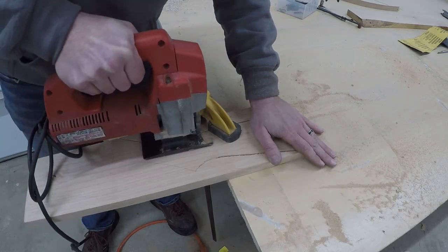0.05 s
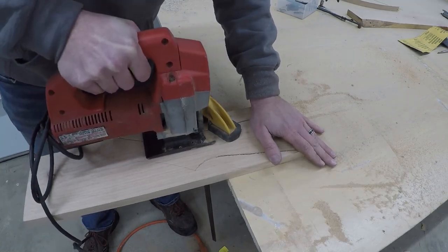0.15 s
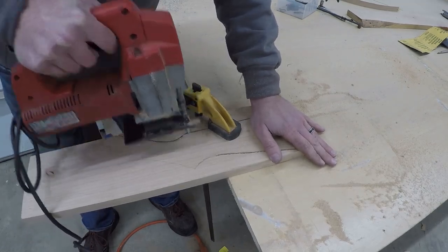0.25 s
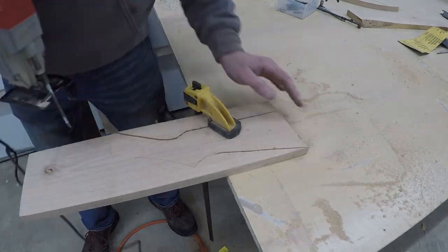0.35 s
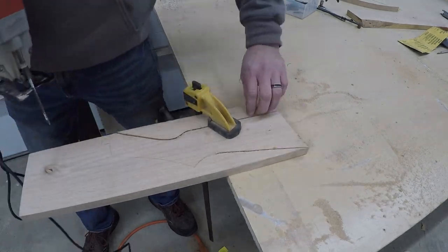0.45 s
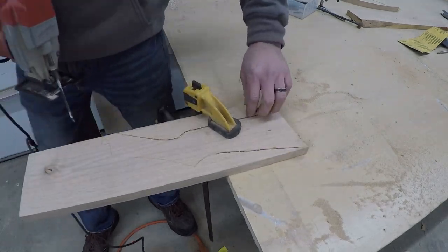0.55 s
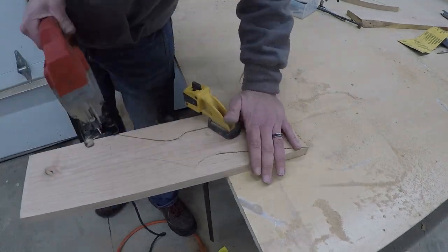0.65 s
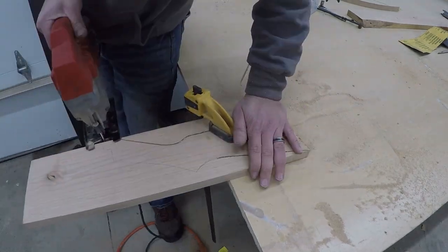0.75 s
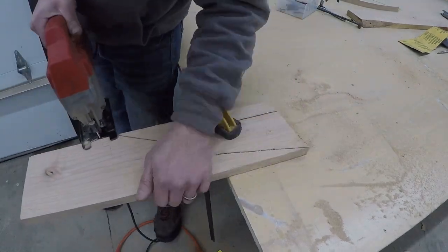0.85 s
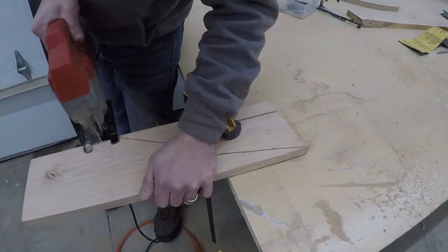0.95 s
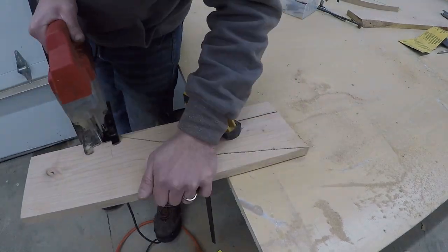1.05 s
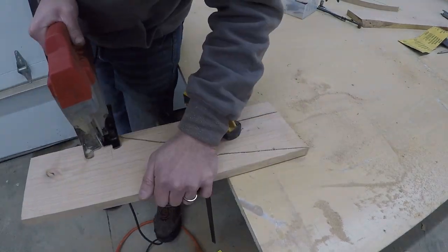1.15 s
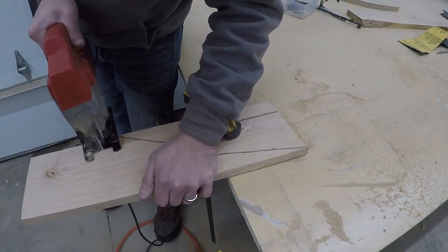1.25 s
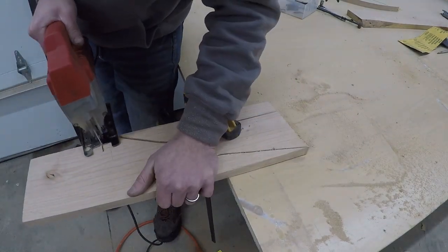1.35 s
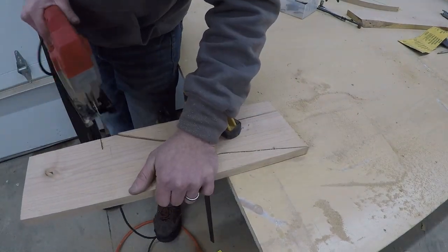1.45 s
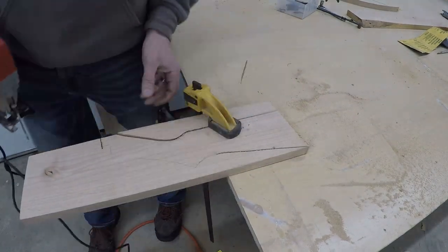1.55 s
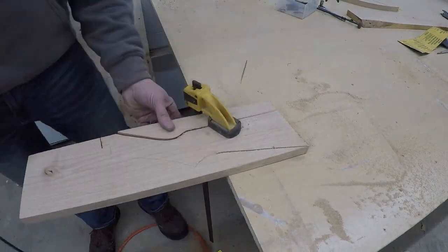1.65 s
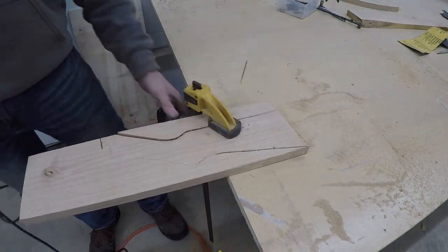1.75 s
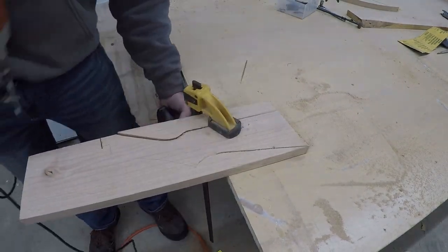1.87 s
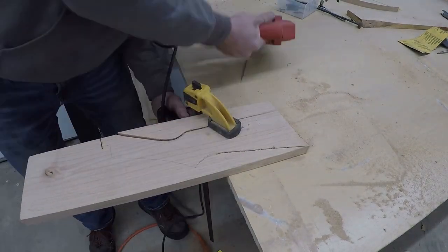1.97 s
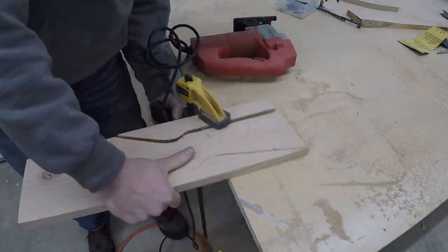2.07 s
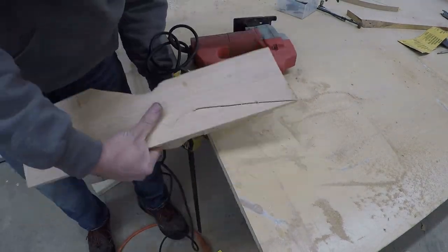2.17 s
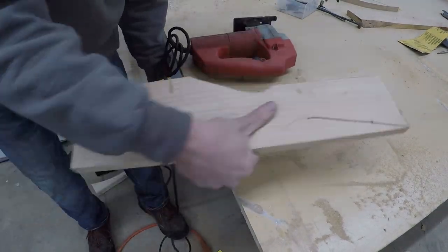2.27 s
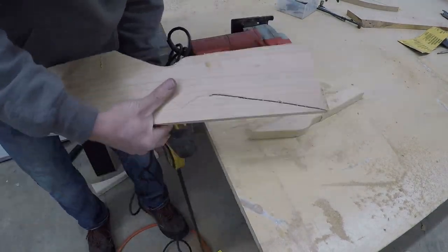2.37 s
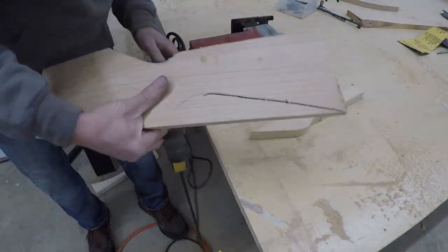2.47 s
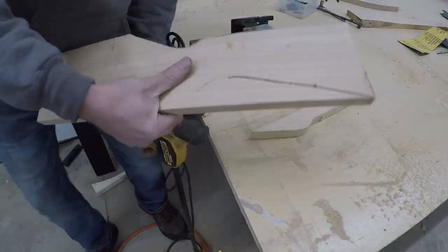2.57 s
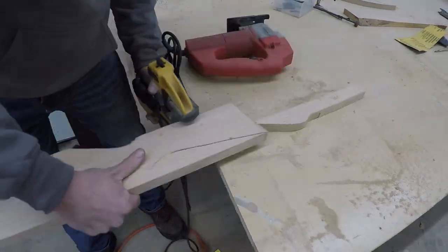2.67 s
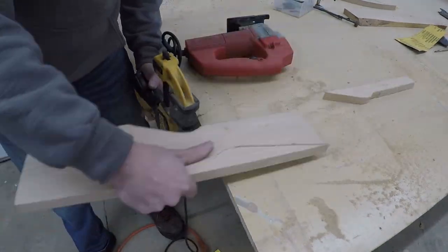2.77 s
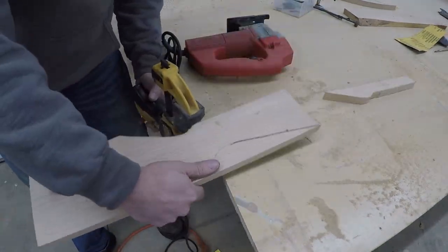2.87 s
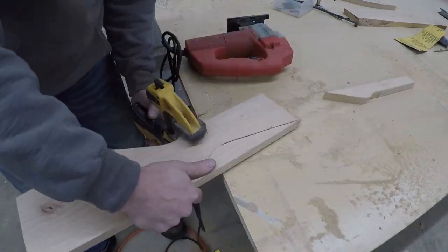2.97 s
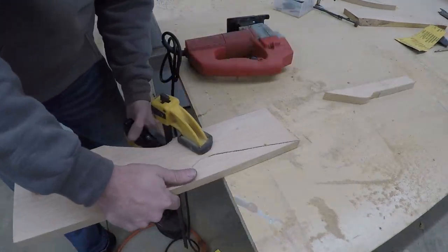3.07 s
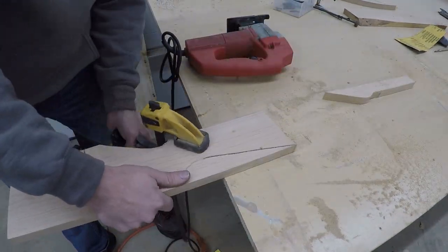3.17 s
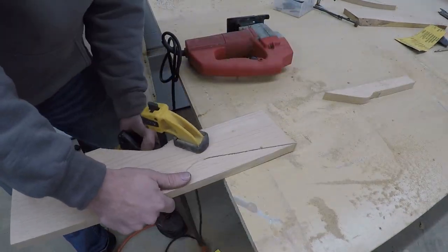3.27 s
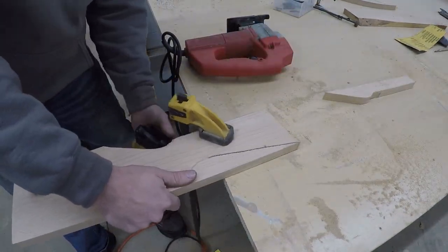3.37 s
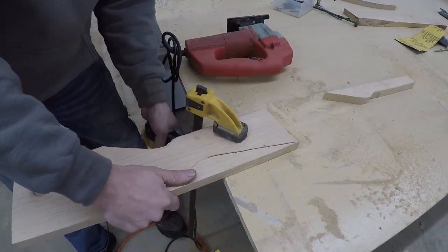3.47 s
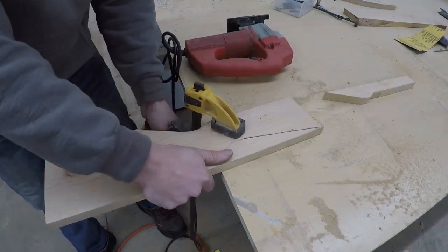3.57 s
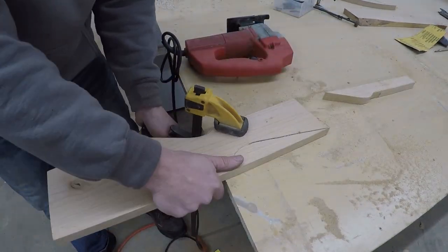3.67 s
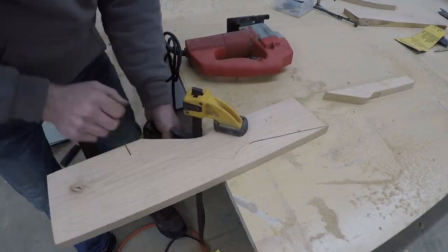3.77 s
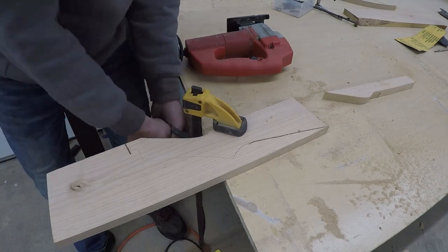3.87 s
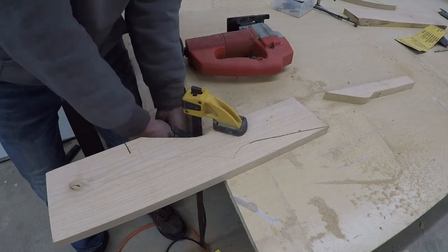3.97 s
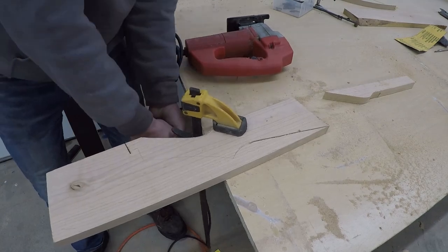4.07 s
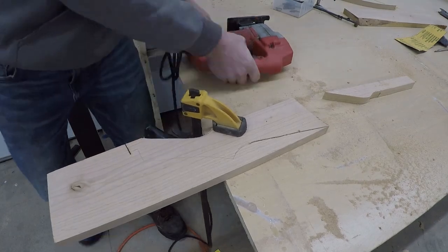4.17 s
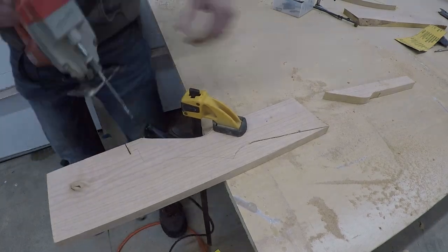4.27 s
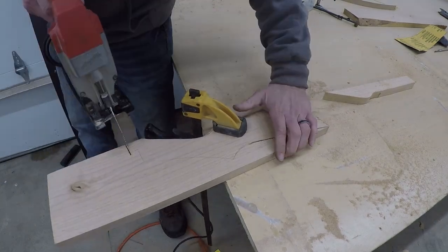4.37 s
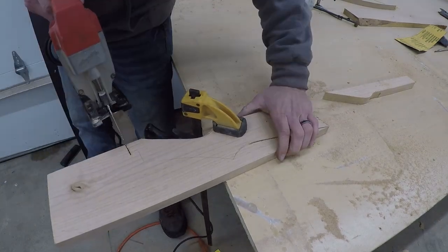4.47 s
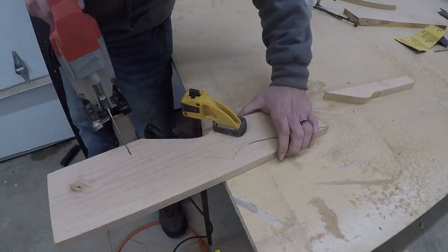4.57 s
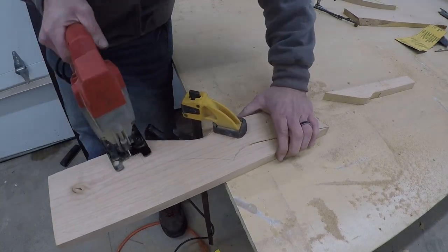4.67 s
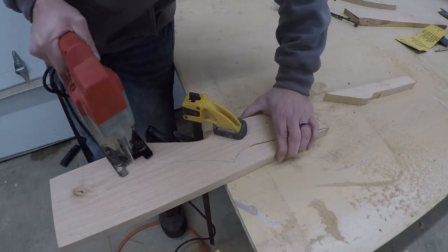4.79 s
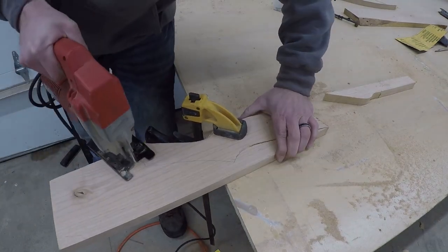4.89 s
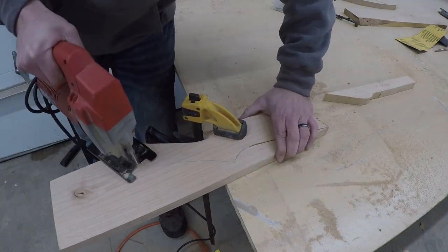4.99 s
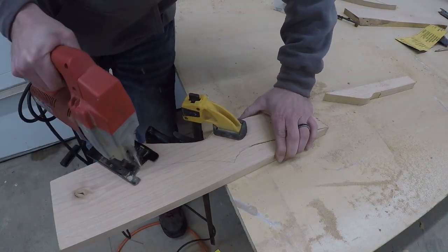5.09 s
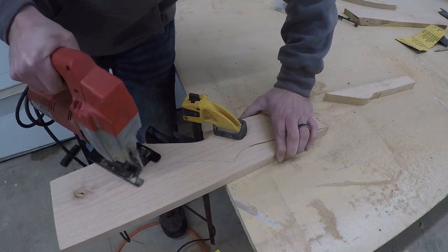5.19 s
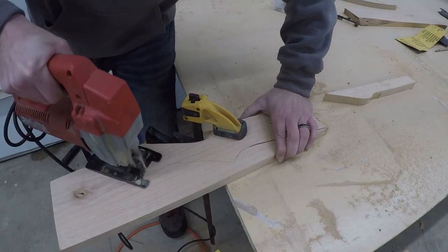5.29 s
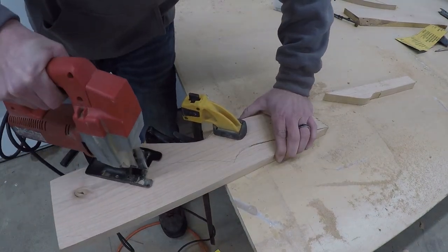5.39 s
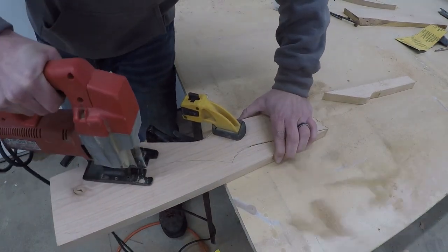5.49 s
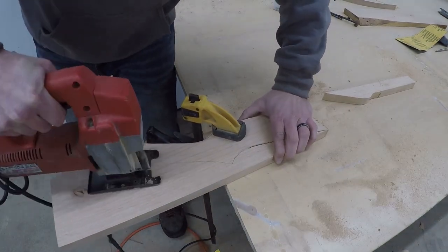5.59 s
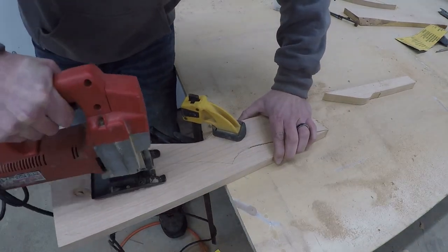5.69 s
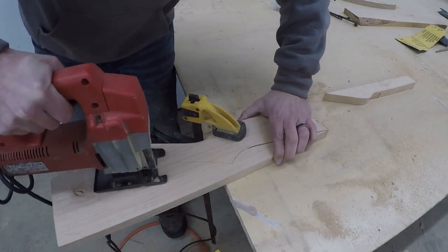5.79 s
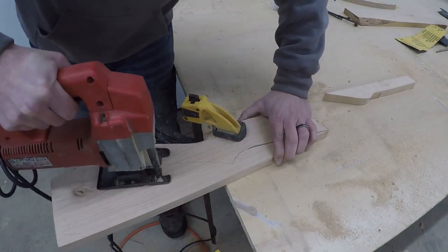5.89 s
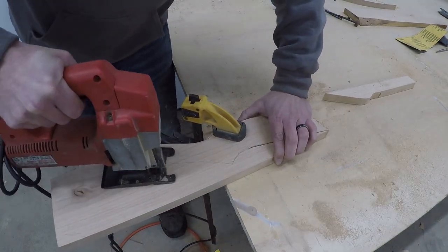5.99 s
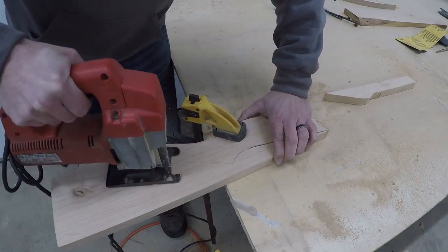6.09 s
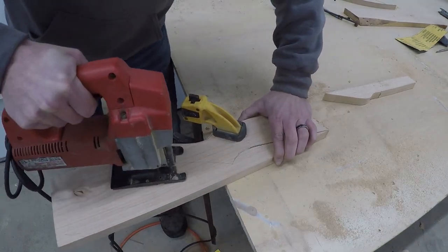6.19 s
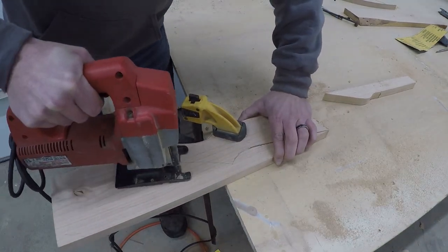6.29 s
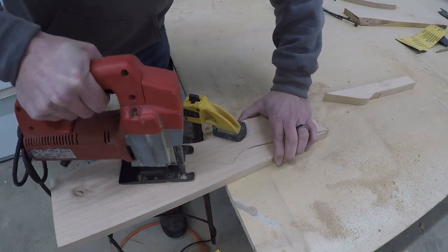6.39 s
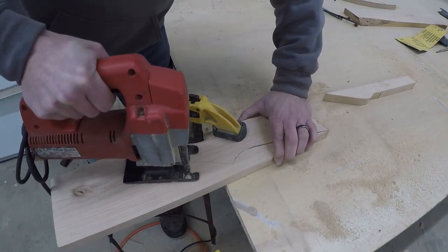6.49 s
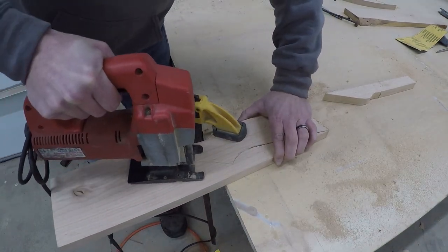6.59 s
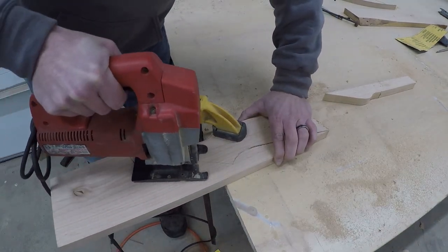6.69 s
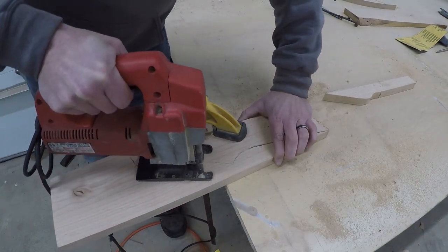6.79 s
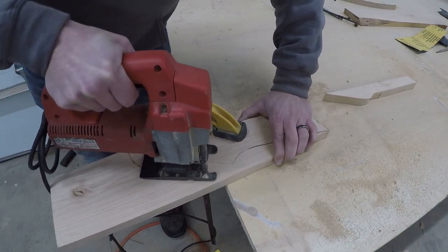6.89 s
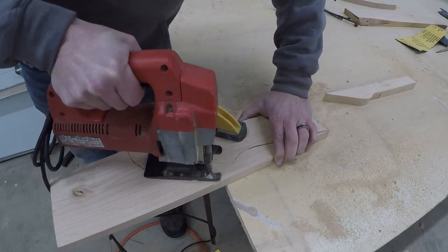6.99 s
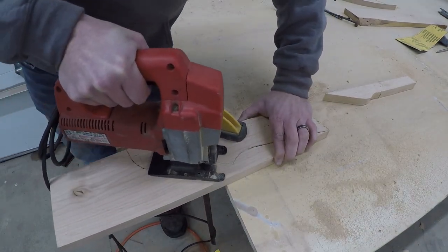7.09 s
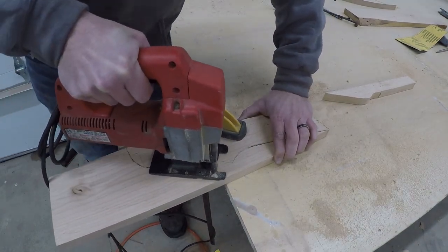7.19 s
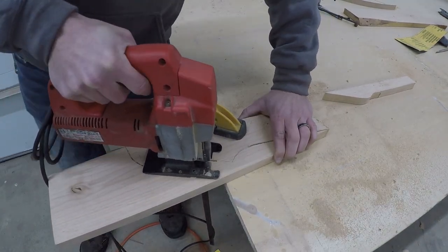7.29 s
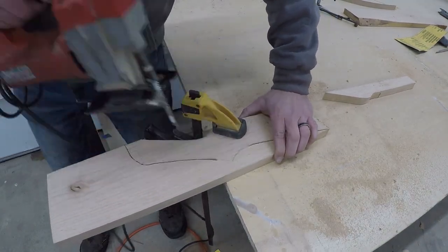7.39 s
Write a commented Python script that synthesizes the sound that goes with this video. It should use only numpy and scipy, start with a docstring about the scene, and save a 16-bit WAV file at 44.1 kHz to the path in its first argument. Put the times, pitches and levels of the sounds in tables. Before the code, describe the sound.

Close to a workbench, an electric saw gives two short whirring bursts with dry taps between them. A double thud marks the tool being put down, followed by ringing clamp clicks, a heavy dull knock of thick wood, sliding and a tiny screw squeak. A third, longer run hums and whines, chatters as its shoe meets the wood, then steadies with rough cutting before winding down. Little room echo, thin bass.

```python
"""A jigsaw runs in three bursts at a workbench, the first already under way at the start.
Its motor hums and whines at multiples of its turning speed, and its fan and blade guide hiss in puffs.
The shoe buzzes on a thick board, slack gears chatter at each start and stop, and the teeth rasp late on.
In between, the saw is set down with two thumps, and the clamp clicks, scrapes and creaks while the
board knocks and slides: short bursts of noise and fading tones, over the quiet air of the shop."""
import sys
import numpy as np
from scipy import signal
from scipy.fft import rfft, irfft, next_fast_len
from scipy.io import wavfile

SR = 44100
rng = np.random.default_rng(int(sys.argv[2]) if len(sys.argv) > 2 else 0)


def dump(signal):
    """Clip the signal to [-1, 1] and save it as 16-bit WAV at the path in sys.argv[1]."""
    limited = np.clip(np.atleast_2d(signal).T, -1, 1)
    pcm = np.round(limited * 32767).astype(np.int16)
    wavfile.write(sys.argv[1], SR, pcm)


N = 328545
T = np.arange(N) / SR   # time of every sample, s


def from_db(db):
    """Turn decibels into gain."""
    return 10 ** (np.asarray(db) / 20)


def rms_one(x):
    """Scale to unit rms, a common measure of strength."""
    return x / np.sqrt(np.mean(x ** 2) + 1e-20)


def in_time(rows):
    """Read each column of a curve at every sample."""
    s, *columns = np.transpose(rows)
    return [np.interp(T, s, column) for column in columns]


def bump(start, top, end):
    """Rise from 0 to 1 and fall back; a bump that ends before its start stays silent."""
    return np.interp(T, [start, top, end], [0, 1, 0])


def swells(rows):
    """Gain that rises and falls once for each row."""
    return sum(from_db(db) * bump(start, top, end) for start, top, end, db, *_ in rows)


def gain_at(spectrum, hz):
    """Gain of a spectrum, read on a log-frequency axis."""
    points, db = np.transpose(spectrum)
    return from_db(np.interp(np.log(hz), np.log(points), db))


def tinted(x, spectrum):
    """Filter a sound by the given spectrum; unit rms."""
    n = next_fast_len(len(x), True)
    gain = gain_at(spectrum, np.fft.rfftfreq(n, 1 / SR) + 1)
    return rms_one(irfft(gain * rfft(x, n), n)[:len(x)])


def coloured(spectrum, size=N):
    """Noise of unit rms with the given spectrum."""
    return tinted(rng.standard_normal(size), spectrum)


def drift(rate):
    """Smooth chance of spread 1 that changes about rate times a second."""
    step = 40   # drawn at every 40th sample, then joined by straight lines
    r = np.exp(-2 * step * np.pi * rate / SR)
    draws = rng.standard_normal(N // step + 2002)
    slow = signal.lfilter([1], [1, -2 * r, r * r], draws)[2000:]   # drop the filter's start
    return np.interp(np.arange(N) / step, np.arange(len(slow)), rms_one(slow))


def tone(phase):
    """Sine of unit rms with a random start."""
    return np.sqrt(2) * np.sin(phase + rng.uniform(0, 2 * np.pi))


def workshop(x, t60, wet_db):
    """Dense, fading reflections from bench, floor and walls, starting after 4 ms."""
    t = T[:SR // 2]
    echoes = rng.standard_normal(len(t)) * from_db(-60 * t / t60) * (t > .004)
    return x + from_db(wet_db) * signal.fftconvolve(x, echoes / np.linalg.norm(echoes))[:N]


def blows(rows, modes, body, ring_db, t60, rise_s, level_db, looseness=((0, 0),)):
    """Each blow starts a fast-dying crack and the ringing modes; a harder contact is brighter."""
    out, t = np.zeros(N + SR), T[:SR // 3]
    for s, db, hardness in rows:
        tilted_body = [(hz, level + hardness * np.log2(hz)) for hz, level in body]
        crack = coloured(tilted_body, size=len(t))
        # the direct snap stands out of the body's decay for a few milliseconds
        crack *= 0.77 * from_db(-60 * t / t60) + 0.64 * np.exp(-t / 0.0013)
        ring = sum(from_db(level + rng.normal(0, 0.89) - 60 * t / life) * tone(2 * np.pi * hz * t)
                   for hz, level, life in modes)
        ring_gain = from_db(ring_db + np.interp(s, *np.transpose(looseness)))
        onset = 1 - np.exp(-t / rise_s)
        at = round(s * SR)
        out[at:at + len(t)] += from_db(db + level_db) * (crack + ring_gain * ring) * onset
    return out[:N]


# colour of the quiet air of the shop: (f/Hz, level/dB per Hz)
AIR_COLOUR = [(65, -3.5), (160, -3), (330, 0), (560, -3.5), (800, -21.5), (16000, -32)]


def shop_air():
    """The air of the shop is a faint, steady, mostly low noise."""
    return from_db(-62.5) * coloured(AIR_COLOUR)


# hands, sleeves and board slide about: (start t/s, loudest t/s, end t/s, level/dB)
SLIDE_TIMES = [(3.37, 3.41, 3.27, -47), (3.5, 3.93, 5.07, -64), (4.64, 4.74, 4.87, -54.5)]
# colour of rustling and sliding: (f/Hz, level/dB per Hz)
RUSTLE_COLOUR = [(50, -13), (150, 7), (700, -5), (900, 6.5), (1150, -13), (1460, 0), (2200, -15),
                 (16000, -21)]
RUSTLE_DB = -66.5   # faint steady rustle under the slides
CONTACTS_PER_S, CONTACT_DECAY_S, CONTACT_SPREAD_DB = 110, 0.0052, 1.5


def handling(smooth):
    """Sleeves rustle; wood and clamp slide in many tiny contacts, each dying within milliseconds."""
    strength = from_db(CONTACT_SPREAD_DB * np.minimum(rng.standard_normal(N), 2))
    touches = (rng.random(N) < CONTACTS_PER_S / SR) * strength
    keep = np.exp(-1 / (CONTACT_DECAY_S * SR))
    grain = rms_one(signal.lfilter([1], [1, -keep], touches + 1e-18))
    return (from_db(RUSTLE_DB) + swells(SLIDE_TIMES)) * (smooth + grain) * coloured(RUSTLE_COLOUR)


# small hard ticks: (t/s, relative level/dB, hardness/dB per octave)
TICK_BLOWS = [(.483, -48, 1.5), (.681, -42, 4.5), (.732, -35.5, 5.5), (1.688, -41, -1.5), (1.909, -41.5, 9),
              (2.55, -39.5, -2.5), (4.0795, -34.5, -1)]
# dense, quickly damped resonances of a tick: (f/Hz, level/dB per Hz)
TICK_COLOUR = [(200, -4.5), (1000, 2.5), (3000, 2.5), (16000, -7.5)]


def ticks():
    """Small hard contacts give a short crack of noise without a ring."""
    return blows(TICK_BLOWS, [], TICK_COLOUR, ring_db=0, t60=0.087, rise_s=0.00054, level_db=-2.0)


# knocks on the board: (t/s, relative level/dB, hardness/dB per octave)
KNOCKS = [(.309, -30.5, 1), (.337, -22.5, 7), (.713, -34, 2.5), (.895, -35, 6), (1.837, -35.5, 1),
          (1.909, -32.5, 3.5), (2.657, -14.5, 2.5), (3.395, -30, 2), (3.582, -40, 1.5), (3.634, -41, 0.5),
          (3.94, -38, 3.5), (4.383, -26, 2.5), (4.479, -38.5, -12), (4.726, -27, 3)]
# what the board rings with: (f/Hz, level/dB, time to fall 60 dB t/s)
BOARD_RING = [(358, 1.5, 0.022), (640, 4.4, 0.033)]
# dense, quickly damped resonances of the board: (f/Hz, level/dB per Hz)
BOARD_COLOUR = [(50, -16), (150, -0.5), (400, 8), (700, 4), (1200, -7), (3000, -21), (6000, -34.5),
                (16000, -43.5)]


def board_knocks():
    """The thick board answers a knock with a dull crack and two short tones."""
    return blows(KNOCKS, BOARD_RING, BOARD_COLOUR, ring_db=-7.5, t60=0.05, rise_s=0.0021, level_db=-1.0)


# the clamp clicks: (t/s, relative level/dB, hardness/dB per octave)
CLICKS = [(2.3195, -24.5, 0), (2.337, -24, 1), (2.787, -30, -4.5), (2.797, -31, 2), (2.8175, -29, 1),
          (2.8555, -27.5, -3), (2.866, -32, 0), (2.879, -33, -4), (2.978, -36.5, -2.5), (3.08, -40, -9),
          (3.12, -27, -6), (3.4655, -22.5, 0.5), (3.776, -41, -12), (3.835, -43, -3.5), (3.916, -33, -14),
          (4.176, -33.5, -2), (4.235, -26.5, 1), (4.2515, -21.5, -1.5), (4.264, -33.5, 1.5)]
# what the clamp's steel bar rings with: (f/Hz, level/dB, time to fall 60 dB t/s)
BAR_RING = [(1035, -1, .06), (1464, 2, .125), (1540, -4, .07), (1987, -11, .044), (2498, -17, .11)]
# dense, quickly damped resonances of the clamp: (f/Hz, level/dB per Hz)
CLAMP_COLOUR = [(300, -12), (1100, 0.5), (1600, -4.5), (2600, -6.5), (16000, -21.5)]
# the bar rings while it hangs loose and is damped once it grips: (t/s, added ring level/dB)
BAR_LOOSENESS = [(2.9, 1.5), (3.4, -7)]


def clamp_clicks():
    """Clicks set the clamp's steel bar ringing, less so once it grips."""
    return blows(CLICKS, BAR_RING, CLAMP_COLOUR, ring_db=-7.0, t60=0.048, rise_s=0.00042,
                 level_db=-5.0, looseness=BAR_LOOSENESS)


# the jaw scrapes along the bar: (start t/s, loudest t/s, end t/s, level/dB)
SCRAPE_TIMES = [(2.245, 2.275, 2.28, -47.5), (2.735, 2.755, 2.63, -46.5), (2.97, 3.06, 3.23, -59.5),
                (3.545, 3.61, 3.5, -45)]


def scrapes(slips_per_s, grit_db):
    """Many tiny slips of the jaw set the clamp's bar ringing, with some gritty noise."""
    slips = (rng.random(N) < slips_per_s / SR) * rng.standard_normal(N)
    t = T[:SR // 2]
    bar = sum(from_db(db - 60 * t / life) * np.sin(2 * np.pi * hz * t) for hz, db, life in BAR_RING)
    ringing = rms_one(signal.fftconvolve(slips, bar)[:N])
    grit = from_db(grit_db) * tinted(slips, CLAMP_COLOUR)
    return swells(SCRAPE_TIMES) * (ringing + grit)


# the clamp screw creaks: (start t/s, loudest t/s, end t/s, level/dB)
SQUEAK_TIMES = [(3.984, 4.008, 4.03, -37.5)]
# resonances of the creaking screw: (f/Hz, level/dB)
SCREW_TONES = [(1210, 4), (1960, -4), (2490, 2.5), (4370, -6)]
SLIPS_PER_S, SLIP_T60_S = 620, 0.016   # the slip rate wanders around this value


def squeaks(uneven):
    """The clamp screw sticks and slips as it is tightened; each slip rings its resonances briefly."""
    turns = np.cumsum(SLIPS_PER_S * np.exp(uneven * drift(69))) / SR
    slips = np.diff(np.floor(turns), prepend=0) * from_db(4.3 * drift(200))
    t = T[:SR // 10]
    ring = sum(from_db(db - 60 * t / SLIP_T60_S) * np.sin(2 * np.pi * hz * t) for hz, db in SCREW_TONES)
    return swells(SQUEAK_TIMES) * rms_one(signal.fftconvolve(slips, ring)[:N])


# the saw is set down: (t/s, relative level/dB, hardness/dB per octave)
SET_DOWN = [(2.0465, -12.5, -3), (2.078, -13, -1.5)]
# what the saw rings with: (f/Hz, level/dB, time to fall 60 dB t/s)
SAW_RING = [(538, -12, .12), (800, 2, .045), (1470, 0, .09), (1776, -5, .07), (2767, -9, .06)]
# dense, quickly damped resonances of the saw: (f/Hz, level/dB per Hz)
SAW_COLOUR = [(300, -31), (800, 4.5), (1500, -3.5), (3000, -7.5), (5000, -12), (16000, -10)]


def saw_set_down():
    """The saw lands with a thump of noise and a weak ring of its own tones."""
    return blows(SET_DOWN, SAW_RING, SAW_COLOUR, ring_db=-14.5, t60=0.087, rise_s=0.00032, level_db=-2.0)


# the trigger is pulled: (on t/s, off t/s, relative hiss level/dB, relative chatter level at the start/dB,
# relative chatter level at the stop/dB, braking/turns per s per s)
TRIGGER_RUNS = [(-.2, .227, -29, -45, -43, 2050), (.983, 1.425, -28, -31, -39, 1750),
                (4.767, 7.316, -28, -35, -41, 1750)]
# speed the motor settles at under the steady drag of the wood: (t/s, speed/turns per s)
CRUISE_SPEED = [(0, 368), (1.432, 362), (4.83, 341), (5.261, 362), (5.491, 360), (5.602, 347), (5.82, 357),
                (6.581, 362), (7.14, 363), (7.31, 374)]
# the shoe buzzes on the wood and loads the motor:
# (start t/s, loudest t/s, end t/s, relative level/dB, speed lost before inertia smooths it/turns per s)
SHOE_BUZZES = [(4.984, 4.998, 5.022, -27.5, 30), (5.315, 5.335, 5.385, -34, 30),
               (5.385, 5.425, 5.442, -33, 40), (5.493, 5.528, 5.545, -31, 36),
               (5.538, 5.55, 5.579, -25.5, 60), (5.635, 5.665, 5.76, -39, 26)]
INERTIA_S, SWITCH_ON_S = .021, .01   # time to gain speed; time for the hiss to come on
HUM_BRAKE_POWER, HISS_BRAKE_POWER = 3.3, 0.85   # levels as powers of the speed while braking


def motor():
    """Speed, air flow and vibration: it spins up, sags under each buzz and brakes evenly when let go."""
    cruise, = in_time(CRUISE_SPEED)
    keep = np.exp(-1 / (INERTIA_S * SR))
    load = sum(lost * bump(start, top, end) for start, top, end, _, lost in SHOE_BUZZES)
    sag = signal.lfilter([1 - keep], [1, -keep], load)
    share, flow, drive = 0, 0, 0
    for on, off, db, _, _, brake in TRIGGER_RUNS:
        since = np.maximum(T - on, 0)
        braking = np.clip(1 - brake * (T - off) / cruise, 0, 1)
        spin = 1 - np.exp(-since / INERTIA_S)
        share += spin * braking
        # hum and whine die faster than the hiss as the motor runs down
        drive += spin * braking ** HUM_BRAKE_POWER
        flow += from_db(db) * np.minimum(since / SWITCH_ON_S, 1) * braking ** HISS_BRAKE_POWER
    return share * (cruise - sag), flow, drive


SEATED_S = (5.07, 5.63)   # in the last run the saw is lowered from its nose onto its shoe


def stance():
    """Shares of three settings: the first two runs, then the last run tilted on its nose, then seated."""
    seated = np.interp(T, SEATED_S, [0, 1])
    tilted = (T > TRIGGER_RUNS[-1][0]) * (1 - seated)
    first_runs = np.maximum(1 - tilted - seated, 0)
    return np.array([first_runs, tilted, seated])


# colour of the teeth's rasp: (f/Hz, level/dB per Hz)
RASP_COLOUR = [(300, -36), (800, 1), (1350, 1), (2100, -15), (2800, 1), (3700, -3.5), (6000, -3)]


def rasp(angle, depth):
    """The teeth tear at the wood, hardest once in each blade stroke of eight motor turns."""
    stroke = np.sin(angle / 8)
    return from_db(-39) * coloured(RASP_COLOUR) * (1 + depth * stroke)


# lead before a stop, then time from a start or stop to the loudest moment and to the end
RATTLE_LEAD_S, RATTLE_PEAK_S, RATTLE_END_S = .025, .038, .08


def slack():
    """Gain of the chatter while the drive is slack, at every start and stop."""
    starts = swells([(on, on + RATTLE_PEAK_S, on + RATTLE_END_S, db)
                     for on, _, _, db, _, _ in TRIGGER_RUNS])
    stops = swells([(off - RATTLE_LEAD_S, off + RATTLE_PEAK_S, off + RATTLE_END_S, db)
                    for _, off, _, _, db, _ in TRIGGER_RUNS])
    return starts + stops


# how the housing colours a buzz: (f/Hz, level/dB)
HOUSING_COLOUR = [(330, -11.5), (650, -3), (1000, -1), (1400, -9.5), (2000, -13), (2800, -12.5),
                  (7000, -28)]


def chatter(angle, speed, count):
    """Slack gears knock once a turn; rough harmonics below count glide through housing resonances."""
    knocks = 0
    for k in range(1, count):
        rough = from_db(2.5 * drift(110)) * tone(k * angle + .35 * drift(90))
        knocks += gain_at(HOUSING_COLOUR, k * speed + 1) ** 2 * rough
    return slack() * knocks


# the blade tip plunges in and splinters the surface: (start t/s, loudest t/s, end t/s, level/dB)
PLUNGE_TIMES = [(5.49, 5.558, 5.58, -33), (5.56, 5.61, 5.53, -37.5)]


def rattle(angle, shoe_db, loose_db):
    """Loose parts, the shoe and the plunging blade clatter in step with the shaft."""
    taps = (1 + np.cos(angle)) ** 2 * from_db(2 * drift(200)) * rng.standard_normal(N)
    loose = from_db(loose_db) * slack() * tinted(taps, HOUSING_COLOUR)
    shoe = from_db(shoe_db) * swells(SHOE_BUZZES) * tinted(taps, SAW_COLOUR)
    splinters = swells(PLUNGE_TIMES) * tinted(taps, RASP_COLOUR)
    return loose + shoe + splinters


# hiss of the first two runs: (f/Hz, level/dB per Hz)
FIRST_RUNS_COLOUR = [(100, -51), (900, -3), (2000, -10.5), (2900, -4), (3800, -6.5), (6200, -1),
                     (8200, 2.5), (16000, 1.5)]
# hiss of the last run with the saw tilted on its nose for the plunge: (f/Hz, level/dB per Hz)
TILTED_COLOUR = [(130, -35), (400, -14), (1000, -13), (3800, -14), (6100, 5.5), (7200, -1.5), (8100, 5.5),
                 (10000, 1), (13400, 2.5), (16000, -3.5)]
# hiss of the last run with the shoe seated on the board: (f/Hz, level/dB per Hz)
SEATED_COLOUR = [(130, -91), (350, -20.5), (1200, -7), (1800, -14), (3800, -11.5), (5800, -2), (8000, .5),
                 (16000, -0.5)]
# bands that swell or dip as the saw turns over the board: (strongest t/s, f/Hz, level change/dB)
TURNING_BANDS = [(.1, 8900, 5), (1.2, 7000, 5), (5.95, 7040, 4), (6.2, 11700, 3), (6.45, 13800, 1),
                 (6.45, 12500, -12)]
BAND_WIDTH_HZ, BAND_SWELL_S = 550, 0.76


def hiss(angle, held):
    """Air and friction noise in sharp puffs, one a turn, with a colour for each of the three settings."""
    colours = (FIRST_RUNS_COLOUR, TILTED_COLOUR, SEATED_COLOUR)
    noise = sum(np.sqrt(share) * coloured(colour) for share, colour in zip(held, colours))
    for s, hz, db in TURNING_BANDS:
        band = signal.lfilter(*signal.iirpeak(hz, hz / BAND_WIDTH_HZ, fs=SR), noise)
        noise = noise + (from_db(db) - 1) * bump(s - BAND_SWELL_S, s, s + BAND_SWELL_S) * band
    puffs = 1 + .2 * np.cos(angle) + .23 * np.cos(2 * angle) + .13 * np.cos(3 * angle)
    return noise * puffs * from_db(0.93 * drift(200))


# armature slots, fan blades and gear teeth whine at these multiples of the motor speed: (multiple)
WHINE_MULTIPLES = [5, 6, 7, 8, 9, 13, 15, 17.5, 22]
# whine of the first two runs, then of the last run tilted and seated, a row each:
# (relative level/dB, one for each multiple)
WHINE_LEVELS = [
    [-18.5, -24, -23, -12.5, -31, -18.5, -18.5, -19, -12],
    [-41, -37, -22.5, -23.5, -22.5, -23, -25, -16, -14],
    [-29.5, -27, -26.5, -23, -22.5, -40, -18.5, -15, -12.5],
]


def whine(angle, held, flutter_db, wander):
    """High multiples of the motor; play in the gears smears the highest ones into narrow bands."""
    play = drift(100)
    total = 0
    for k, db in zip(WHINE_MULTIPLES, np.transpose(WHINE_LEVELS)):
        smear = (k / 21) ** 3
        gain = from_db(db @ held + flutter_db * drift(7.2))
        total += gain * tone(k * angle + smear * play + wander * drift(29))
    return total


# hum at 1, 2, 3 and 4 times the motor speed: (relative level in the first two runs/dB,
# in the last run tilted/dB, seated/dB, slope/dB per dB of the third-harmonic curve, extra at full feed/dB)
HUM_LEVELS = [(-53.5, -43, -53.5, -.5, 5.5), (-39.5, -32.5, -47, 1.26, 11.5), (-31, -32.5, -34, 1, -3.5),
              (-48, -48, -42, 0.77, 0)]


def hum(angle, drive, third_db, held, feed, flutter_db, stroke_depth, count):
    """The rotor shakes housing and board; the shoe tapping once a turn swells a row of harmonics."""
    orders = np.arange(1, count + 1)
    colour = gain_at(HOUSING_COLOUR, orders * np.min(np.array(CRUISE_SPEED)[:, 1]))
    taps = sum(from_db(db) * np.sqrt(bump(start, top, end)) for start, top, end, db, _ in SHOE_BUZZES)
    # no two taps are alike, so each harmonic is rough
    gains = [share * taps * from_db(2 * drift(90)) for share in colour / np.linalg.norm(colour)]
    for k, (*db, slope, feed_db) in enumerate(HUM_LEVELS):
        shake = drive * from_db(db @ held + slope * third_db + feed_db * feed)
        gains[k] = np.hypot(gains[k], shake) * from_db(flutter_db * drift(19.6))
    harmonics = sum(gain * tone(k * angle) for k, gain in zip(orders, gains))
    # the geared-down blade stroke rocks the saw a little
    return harmonics * (1 + stroke_depth * np.sin(angle / 8))


# how strongly the third hum harmonic sounds; the others follow by their own slopes:
# (t/s, relative level/dB)
THIRD_HARMONIC = [(.17, -8.5), (.25, -22), (1.03, -3), (1.33, -4), (1.38, -17), (4.83, -4.5), (5.13, -7),
                  (5.29, -6), (5.43, -0.5), (5.478, -13), (5.62, -10), (5.705, 3), (5.768, 1), (5.787, -9),
                  (5.85, -3.5), (5.98, 0.5), (6.4, -4), (6.8, -6), (7.15, -6.5), (7.25, -17.5)]
# dB per dB of that curve: the first raises hiss and whine alike, the second adds to the whine
HISS_FOLLOWS, WHINE_FOLLOWS = 0.081, 0.41
FEED_S = (6.4, 7.1, 8.2)        # the blade is fed into the wood: start, strongest, end
LANDING_S = (5.54, 5.6, 5.75)   # the shoe comes down flat: start, deepest dip, end
LANDING_DB = -8.5               # hiss and whine dip together
WHINE_FEED_DB = 3               # the gears whine louder at full feed


def jigsaw():
    """One shaft times hum, whine, hiss, rasp and rattle; the rasp's level follows only the feed."""
    speed, flow, drive = motor()
    angle = 2 * np.pi * np.cumsum(speed * (1 + 0.00084 * drift(19.3))) / SR
    third_db, = in_time(THIRD_HARMONIC)
    held, feed = stance(), bump(*FEED_S)
    flow = flow * from_db(HISS_FOLLOWS * third_db + LANDING_DB * bump(*LANDING_S))
    whine_gain = drive * from_db(WHINE_FOLLOWS * third_db + WHINE_FEED_DB * feed)
    high = whine_gain * whine(angle, held, flutter_db=2.5, wander=0.38)
    # bench and board throw the hiss back almost at once, which colours it in narrow bands
    air = workshop(hiss(angle, held), t60=.012, wet_db=-14)
    low = hum(angle, drive, third_db, held, feed, flutter_db=2.1, stroke_depth=0.03, count=18)
    cutting = feed * rasp(angle, depth=0.4)
    loose = rattle(angle, shoe_db=-10, loose_db=-9) + chatter(angle, speed, count=10)
    return low + flow * (high + air) + cutting + loose


def scene():
    """Saw, knocks and handling over the quiet air of the shop, heard from one point."""
    things = ticks() + board_knocks() + clamp_clicks() + saw_set_down()
    things += scrapes(slips_per_s=880, grit_db=-7) + squeaks(uneven=.25)
    background = shop_air() + handling(smooth=0.16)
    mono = background + workshop(things, t60=0.13, wet_db=-11.5) + jigsaw()
    return np.array([mono, mono])


LOW_CUT_HZ, CUTOFF_HZ = 152, 15800


def record(dry):
    """The small microphone thins the bass; the top is cut steeply."""
    thin = signal.sosfilt(signal.butter(2, LOW_CUT_HZ, "high", fs=SR, output="sos"), dry)
    return signal.sosfilt(signal.ellip(12, .1, 80, CUTOFF_HZ, fs=SR, output="sos"), thin)


dry = scene()
out = record(dry)
dump(out)
```